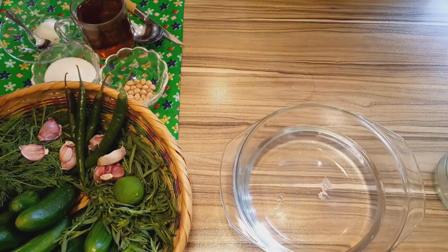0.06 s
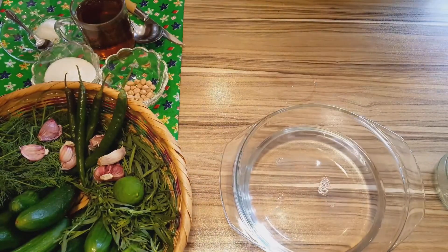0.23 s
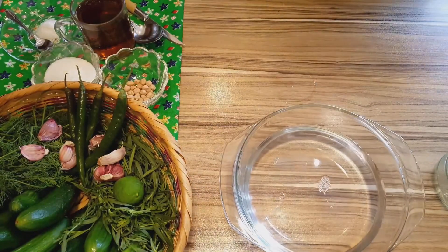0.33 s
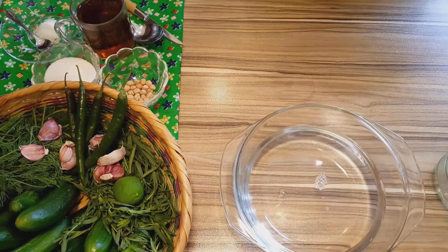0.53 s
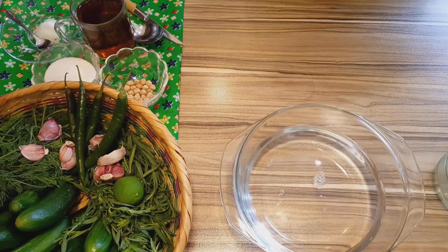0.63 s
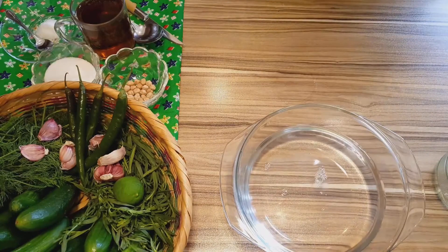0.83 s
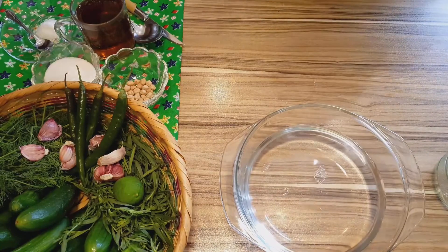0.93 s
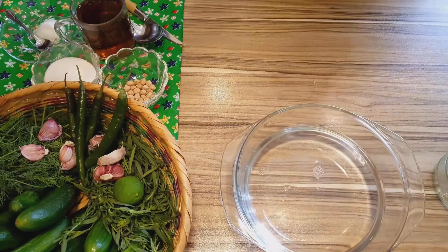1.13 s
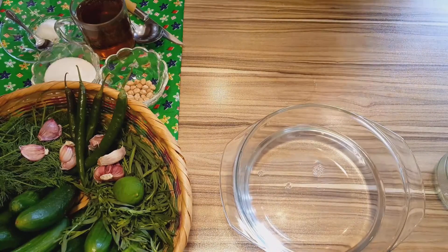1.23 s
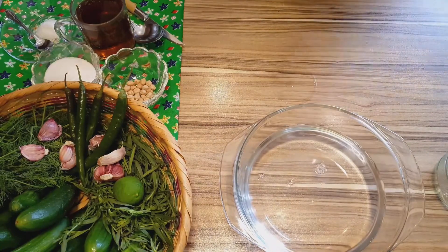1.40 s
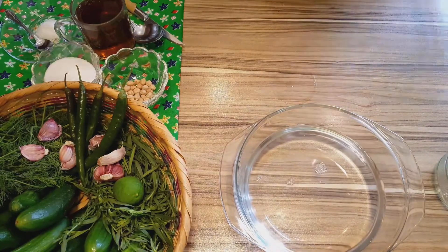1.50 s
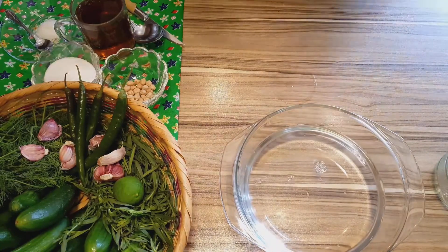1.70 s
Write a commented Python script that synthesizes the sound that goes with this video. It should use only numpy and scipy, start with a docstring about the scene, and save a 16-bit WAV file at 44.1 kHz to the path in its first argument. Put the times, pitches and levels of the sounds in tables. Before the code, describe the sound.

A glass jug is set down on a wooden table. After quiet room tone, its base lands at about 0.2 s with a dull, woody knock, rocking through rapid contacts until 0.27 s, with tiny taps to 0.4 s. A much softer, lower settling knock flutters at 0.63-0.7 s. A short kitchen tail follows; low fridge hum, faint pulsing whine and hiss continue to about 1.75 s.

```python
"""A glass jug is set down on a wooden table in a quiet kitchen: its base lands, rocks through quick
contacts, and later settles with a softer knock. Each contact is a short push that rings the table's
damped modes, ticks the glass and sets off a noise clatter; a diffuse tail adds the kitchen. Beneath, a
fridge hums, whines and buzzes as sums of sines, low drones waver as narrow noise, and the microphones
hiss as shaped noise."""
import sys
import numpy as np
from scipy import signal
from scipy.io import wavfile
from scipy.ndimage import uniform_filter1d

SR = 44100
rng = np.random.default_rng(int(sys.argv[2]) if len(sys.argv) > 2 else 0)


def waveform_to_disk(signal):
    """Save audio, clipped to [-1, 1], as 16-bit WAV at the path in sys.argv[1]."""
    frames = np.transpose(np.atleast_2d(signal))
    scaled = np.clip(frames, -1, 1) * 32767
    samples = np.round(scaled).astype(np.int16)
    wavfile.write(sys.argv[1], SR, samples)


N = 77175

# Room tone and hiss, relative spectrum: (frequency [Hz], density [dB per Hz])
AIR_SPECTRUM = [(15,-42), (35,-37), (59,-18.5), (107,-8), (156,-10), (339,-10.5), (388,-18), (432,-14.5),
                (581,-19), (760,-27.5), (995,-36), (2690,-36), (3520,-28.5), (4480,-38.5), (5800, -43.5),
                (7480,-47.5), (9520,-39), (15400,-30)]
# How alike the air is left and right: (frequency [Hz], likeness [-1 to 1])
AIR_LIKENESS = [(60, 0.49), (130, 0.7), (290, 0.79), (640, 0.035), (1410, -0.045), (3100, -0.29),
                (6820, -0.022), (15000, 0.035)]
# Stereo lean of the air: (frequency [Hz], left minus right [dB])
AIR_LEAN = [(60, 7), (110, 0), (200, -3), (380, -0.5), (700, 3), (1290, 0.0), (2380, 0), (4400, -2.5),
            (8120, 3.5), (15000, 2.5)]
# Change of the hiss around 5 kHz, which grows near the end: (time [s], level [dB])
TREBLE_LIFT = [(0, -2), (1.38, -1), (1.5, 1.5), (1.75, 3.5)]
AIR_DB, PATCH_DB = -53, 2.5  # overall level; depth of the drifting patches

# Compressor hum, shaft orders: {multiple: (left level [dB], right level [dB])}
HUM_ORDERS = {1: (-53, -55), 2: (-68, -70), 3: (-68, -68), 5: (-70, -72), 6: (-75, -63), 7: (-75, -71),
              8: (-77, -72), 9: (-65, -70), 10: (-69, -70), 11: (-65, -80), 12: (-67, -80), 13: (-72, -75),
              14: (-77, -90)}
# Whine, high shaft orders before the overall level: {multiple: (left level [dB], right level [dB])}
WHINE_ORDERS = {63: (-95, -91), 64: (-88, -98), 65: (-87, -91), 66: (-88, -98), 69: (-81, -84),
                70: (-83, -85), 71: (-73, -73), 72: (-72, -73), 73: (-75, -75), 75: (-87, -89),
                76: (-93, -90), 78: (-97, -89), 79: (-92, -84), 85: (-95, -84)}
# Swell and fade of the whine: (time [s], level [dB])
WHINE_SWELL = [(0, 0), (0.201, 1.8), (0.347, -2), (.56, 4.5), (.68, 1.5), (.88, -1), (1.098, 0.9),
               (1.256, 6), (1.33, 2), (1.47, -12), (1.6, -7.5), (1.75, -2)]
# Mains buzz: {multiple of BUZZ_BASE_HZ: level [dB]}
BUZZ_ORDERS = {119: -89, 130: -89, 133: -87, 134: -88, 141: -84, 143: -86, 144: -88, 145: -86, 149: -87,
               150: -84, 152: -88, 153: -87, 154: -82}
SHAFT_HZ, BUZZ_BASE_HZ = 49.13, 99.955
PULSE_S, WHINE_DB = .622, -2.05  # a moment when the whine's pulse falls; overall whine level
WAVER_DB = 1.5  # slow unsteadiness of each order above the first
EVEN_LAG = .17  # [cycles] lag of even orders: splits each pulse into a strong and a weak one
THROB_HZ, THROB_DB, THROB_S = 64.3, -55, 1.152  # low tone beating with the hum, in step at THROB_S

# Unsteady low tones of the room: (frequency [Hz], width of each smoothing stage [Hz], level [dB])
DRONES = [(82.3, 30, -63), (165.8, 9.5, -63.5), (207.4, 23, -61), (270.7, 4.4, -58.5), (336.7, 1.93, -59.5)]

# Contacts of the jug's base: (time [s], level [dB], contact length [ms])
LANDING = [(.2135, -20, 1.05), (.217, -12, .9), (.222, -17, 0.7), (.229, -12.5, 0.34), (.236, -13.5, 3.3),
           (.2445, -15, 2.6), (.253, -15.5, 0.75), (.261, -16, 3), (.272, -22, 1.3), (.298, -36.5, 1.4),
           (.313, -26.5, 1.1), (.336, -41.5, 1.1), (.4, -40.5, 1.6)]
SETTLING = [(.633, -32, 1.1), (.645, -29, 0.82), (.658, -28, 0.63), (.666, -37, 0.9), (.679, -27.5, 1.35),
            (.693, -29, 1.66)]
# Table modes, levels relative to each contact:
# (frequency [Hz], t60 [s], level at landing [dB], level at settling [dB], left minus right [dB])
TABLE_MODES = [(74, 0.283, -14, -27, 2), (106.4, .1, -19.5, -6.5, 3), (163.4, 0.1, -9.5, -2.5, 1.8),
               (250.7, 0.28, -20, -11, 0.3), (264.2, 0.32, -11.5, -23.5, -0.5),
               (324.6, 0.068, -18, -1, -5.5), (379.8, .09, -10.5, -7.5, 5.5), (428.6, .08, -18, -13, -17.7),
               (518.8, 0.081, -1.5, -7, -0.2), (582.6, 0.078, -14.5, -16.5, .6), (736, 0.09, -6.5, -4, 6.5),
               (846, 0.055, -21, -19, 7), (986, 0.096, -16, -20, 0.5), (1305, .13, -27.5, -18, 2.5),
               (1670, 0.12, -35, -26.5, 1)]
# Short high rings of the glass, relative to each contact: (frequency [Hz], t60 [s], level [dB])
GLASS_RINGS = [(8960, 0.044, -46), (12500, 0.054, -48)]
# Broadband clatter of a contact, relative spectrum: (frequency [Hz], density [dB per Hz])
CLATTER_SPECTRUM = [(35, -32.5), (100, -25), (300, -14), (600, -15.5), (900, -16), (1230, -30),
                    (1620, -27.5), (2040, -40), (3500, -47.5), (6680, -60), (9000, -58), (15400, -52.5)]
# Decay of the clatter: (frequency [Hz], t60 [s])
CLATTER_DECAY = [(60, 0.47), (300, 0.64), (1000, 0.18), (3000, 0.21), (8000, 0.33), (15000, 0.16)]
# How alike clatter and reverberation are left and right: (frequency [Hz], likeness [-1 to 1])
KNOCK_LIKENESS = [(60, 0.94), (130, 0.81), (290, 0.9), (640, 0.65), (1410, 0.076), (3100, 0.19),
                  (6820, 0.3), (15000, 0.12)]
CLATTER_LANDING_DB, CLATTER_SETTLING_DB = -21.5, -25  # relative to each contact
RISE_CYCLES = 1  # time constant of a mode's build-up
RIGHT_LAG_MS, LAG_FULL_HZ = 0.43, 660  # the right microphone hears a mode later, low modes less so

ROOM_DB, ROOM_T60_S = -15, 0.5
LOW_CUT_HZ, TOP_EDGE_HZ = 38, 15510


def amp(db):
    """Decibels to a linear gain."""
    return 10 ** (np.asarray(db, float) / 20)


def evened(x):
    """Scale to an RMS of one."""
    return x / np.sqrt(np.mean(x ** 2) + 1e-20)


def read(points, hz):
    """Read a curve between its points along a logarithmic frequency axis."""
    f, value = np.transpose(points)
    return np.interp(np.log(hz + 1), np.log(f + 1), value)


def noise_pair(size, length, likeness, shape_db):
    """Two partly alike channels of noise whose short-time spectrum is shape_db(t, hz)."""
    hop = size // 4
    frames = length // hop + 5
    hz = np.fft.rfftfreq(size, 1 / SR)[:, None]
    a, b, c, d = rng.standard_normal((frames, len(hz), 4)).T
    like = np.clip(read(likeness, hz), -1, 1)
    left = a + 1j * b
    right = like * left + np.sqrt(1 - like ** 2) * (c + 1j * d)
    spectrum = np.array([left, right]) * amp(shape_db(np.arange(frames) * hop / SR, hz))
    return signal.istft(spectrum, nperseg=size, noverlap=size - hop)[1][:, :length]


def air():
    """Room tone and microphone hiss: shaped noise with slight drifting patches."""
    patches = rng.standard_normal((N // 512 + 5, 1025)).T
    patches = uniform_filter1d(patches, size=12, axis=0)  # smooth over frequency
    patches = evened(uniform_filter1d(patches, size=6, axis=1))  # smooth over time
    side = np.array([.5, -.5])[:, None, None]

    def shape_db(t, hz):
        treble_bell = np.exp(-np.log((hz + 1) / 5000) ** 2 / .5)
        lift = np.interp(t, *np.transpose(TREBLE_LIFT)) * treble_bell
        return read(AIR_SPECTRUM, hz) + side * read(AIR_LEAN, hz) + PATCH_DB * patches + lift

    return amp(AIR_DB) * evened(noise_pair(2048, N, AIR_LIKENESS, shape_db))


def tones(base_hz, orders, in_step_s, scatter):
    """Multiples of one rotation, in step at in_step_s but for the even lag and scatter (turns per order)."""
    t, out = np.arange(N) / SR, 0
    for k, db in orders.items():
        turn = k * base_hz * (t - in_step_s)
        turn = turn - EVEN_LAG * (1 - k % 2)
        turn = turn + min(scatter * (k - 1), 1) * rng.random((2, 1))
        waver = np.interp(t, np.linspace(0, N / SR, 12), rng.standard_normal(12))
        waver = waver * min(k - 1, 1)  # the first order stays steady
        level = amp(np.reshape(db, (-1, 1)) + WAVER_DB * waver)
        out = out + np.sqrt(2) * level * np.cos(2 * np.pi * turn)  # levels are RMS
    return out


def fridge():
    """Compressor hum with a throb, a pulsing whine of high shaft orders that swells and fades, mains buzz."""
    swell_db = np.interp(np.arange(N) / SR, *np.transpose(WHINE_SWELL))
    hum = tones(SHAFT_HZ, HUM_ORDERS, THROB_S, 0.082)
    throb = tones(THROB_HZ, {1: THROB_DB}, THROB_S, 1)
    whine = tones(SHAFT_HZ, WHINE_ORDERS, PULSE_S, .002) * amp(WHINE_DB + swell_db)
    buzz = tones(BUZZ_BASE_HZ, BUZZ_ORDERS, 0, 1)
    return hum + throb + whine + buzz


def drones():
    """Low tones that waver: slow noise carried up to each frequency, as narrow bands."""
    out, t = np.zeros(N), np.arange(N) / SR
    for hz, width, db in DRONES:
        pole = np.exp(-np.pi * width / SR)
        slow = rng.standard_normal((2, 2 * N))
        for _ in range(2):
            slow = signal.lfilter([1], [1, -pole], slow)
        slow = slow[:, N:]  # drop the filters' run-in
        turn = 2 * np.pi * hz * t
        out += amp(db) * evened(slow[0] * np.cos(turn) + slow[1] * np.sin(turn))
    return out


def force(contacts):
    """Each contact is one smooth push of its own length; a longer one drives the high modes less."""
    t, pushes = np.arange(N) / SR, 0
    for start, db, ms in contacts:
        bell = np.exp(-.5 * ((t - start) / (ms / 4000)) ** 2)
        pushes = pushes + amp(db) * bell / (ms * SR / 1600)  # same impulse at any length
    return pushes


def table_ring(t, late, level_column):
    """Response of the table to a push: damped modes that build up and die away."""
    ring = 0
    side = np.array([[.5], [-.5]])
    for k, row in enumerate(TABLE_MODES):
        hz, t60, lean = row[0], row[1], row[4]
        u = np.maximum(t - (t - late) * min(hz / LAG_FULL_HZ, 1), 0)
        rise = 1 - np.exp(-u * hz / RISE_CYCLES)
        decay = amp(row[level_column] + side * lean - 60 * u / t60)
        ring = ring + (-1) ** k * rise * decay * np.sin(2 * np.pi * hz * u)
    return ring


def glass_tick(late):
    """Short high rings of the glass, each a decaying sine."""
    return sum(amp(db - 60 * late / t60) * np.sin(2 * np.pi * hz * late) for hz, t60, db in GLASS_RINGS)


def clatter(t):
    """Dull broadband burst: noise that decays at its own rate in each frequency region."""
    def shape_db(u, hz):
        return read(CLATTER_SPECTRUM, hz) - 60 * u / read(CLATTER_DECAY, hz)

    burst = noise_pair(256, len(t), KNOCK_LIKENESS, shape_db)
    burst = burst * np.minimum(t / 0.0046, 1)  # 4.6 ms attack
    return burst / np.sqrt(np.mean(burst[:, :900] ** 2))


def knock(contacts, clatter_db, level_column):
    """The pushes ring the table's modes, tick the glass and set off a dull broadband clatter."""
    t = np.arange(SR // 2) / SR
    late = np.maximum(t - np.array([[0], [RIGHT_LAG_MS / 1000]]), 0)
    ring = table_ring(t, late, level_column)
    tick = glass_tick(late)
    out = signal.fftconvolve(force(contacts)[None], ring, axes=1)[:, :N]
    for start, db, _ in contacts:
        at = round(start * SR)
        out[:, at:at + len(t)] += amp(db) * (amp(clatter_db) * clatter(t) + tick)
    return out


def kitchen(x):
    """Diffuse reverberation: a decaying noise tail, alike in both channels in the bass."""
    tail = noise_pair(256, SR // 2, KNOCK_LIKENESS, lambda t, hz: -60 * t / ROOM_T60_S + 0 * hz)
    # silent for 10.5 ms, then a 21 ms rise
    tail = tail * np.clip(np.arange(SR // 2) / SR / 0.021 - .5, 0, 1)
    tail = tail / np.linalg.norm(tail[0])
    return signal.fftconvolve(x.mean(0)[None], tail, axes=1)[:, :N]


def scene():
    """The jug's landing and settling with their reverberation, over air, fridge and drones."""
    landing = knock(LANDING, CLATTER_LANDING_DB, level_column=2)
    settling = knock(SETTLING, CLATTER_SETTLING_DB, level_column=3)
    jug = landing + settling
    return air() + fridge() + drones() + jug + amp(ROOM_DB) * kitchen(jug)


def record(dry):
    """A short fade-in, a low cut and a steep limit on the top end."""
    faded = dry * np.minimum(np.arange(N) / 300, 1)
    low_cut = signal.butter(4, LOW_CUT_HZ, "high", fs=SR, output="sos")
    top_limit = signal.firwin(1535, TOP_EDGE_HZ, window=("kaiser", 9), fs=SR)
    return signal.oaconvolve(signal.sosfilt(low_cut, faded), top_limit[None], "same")


dry = scene()
out = record(dry)
waveform_to_disk(out)
```